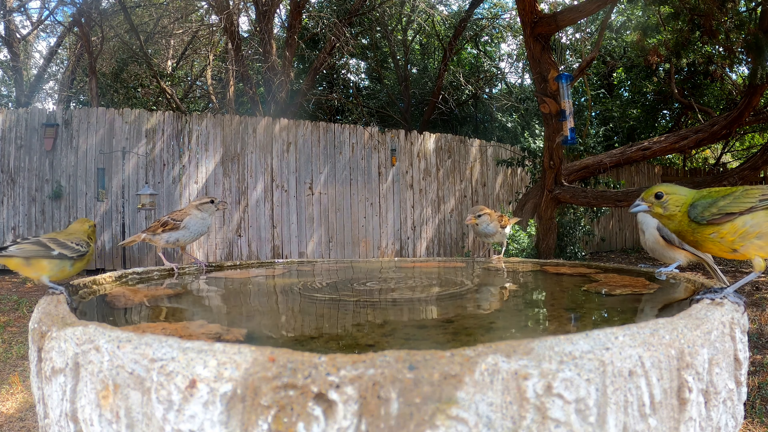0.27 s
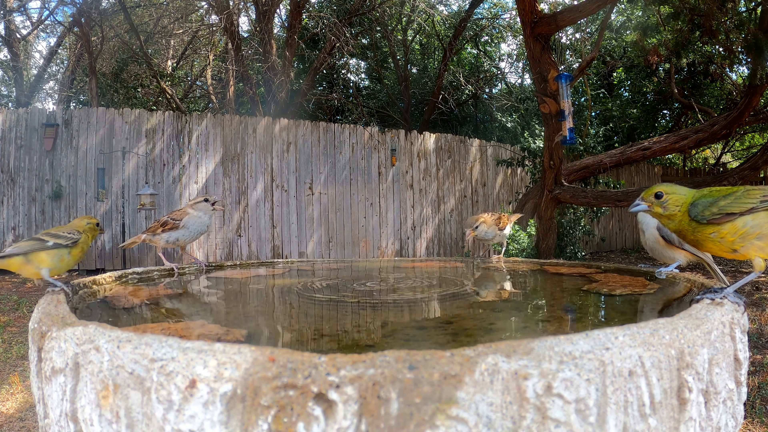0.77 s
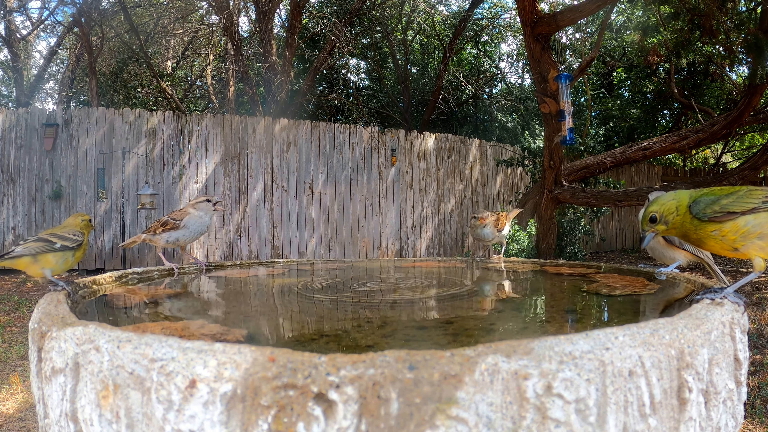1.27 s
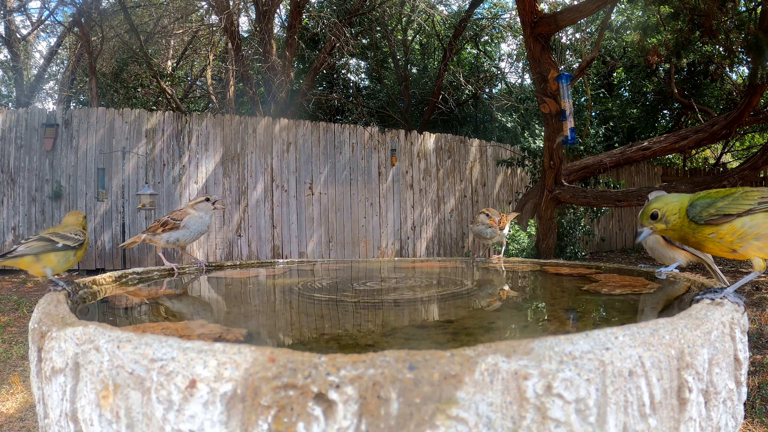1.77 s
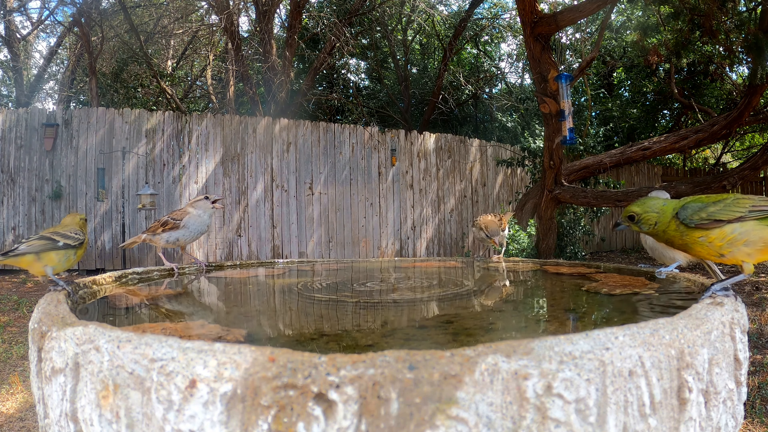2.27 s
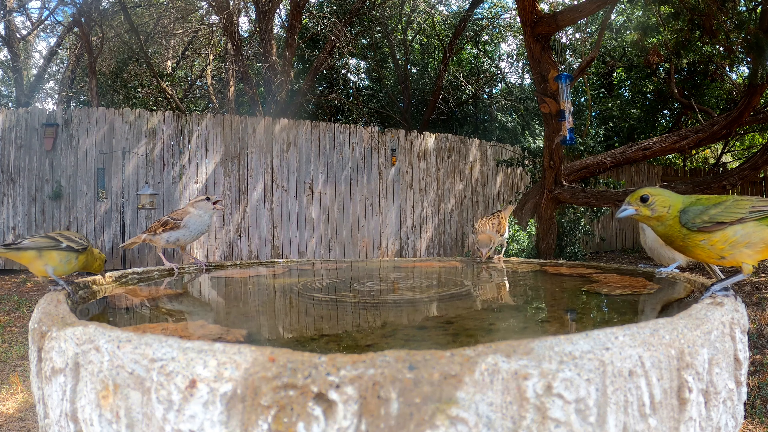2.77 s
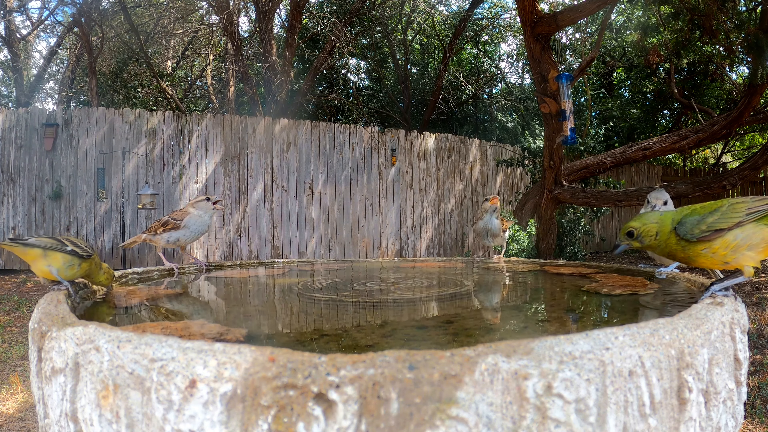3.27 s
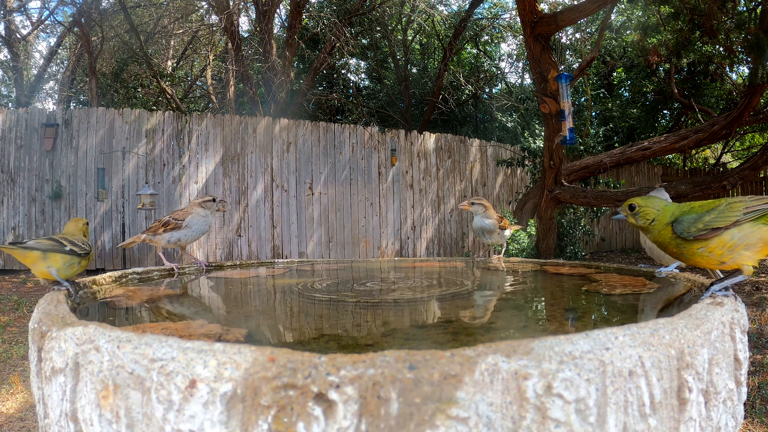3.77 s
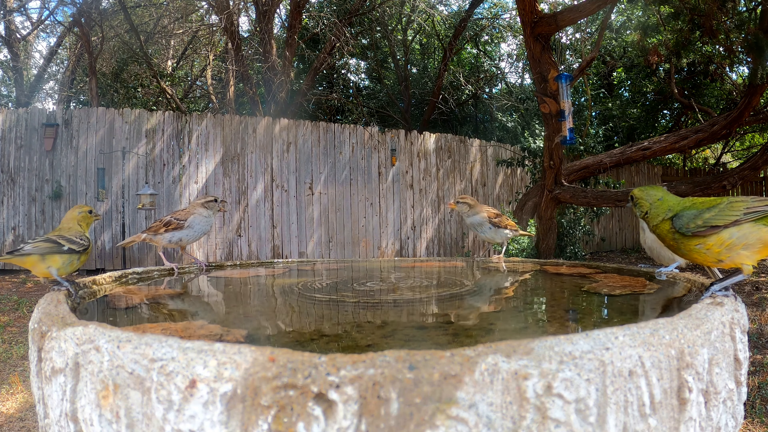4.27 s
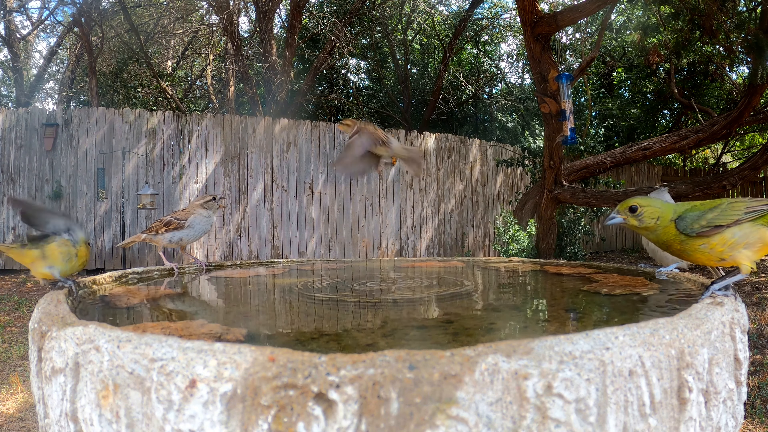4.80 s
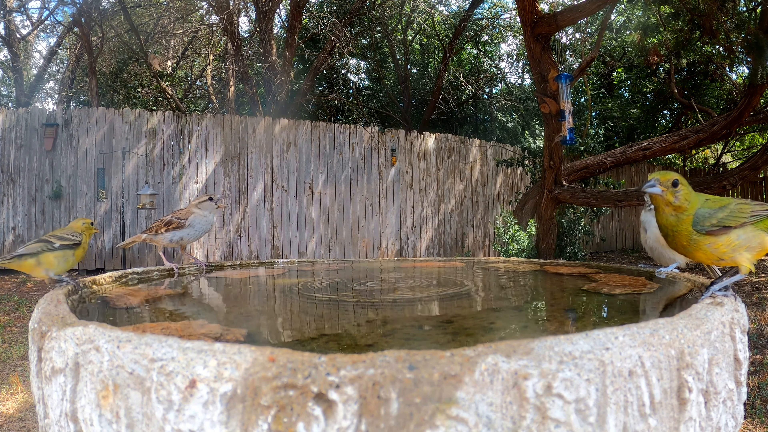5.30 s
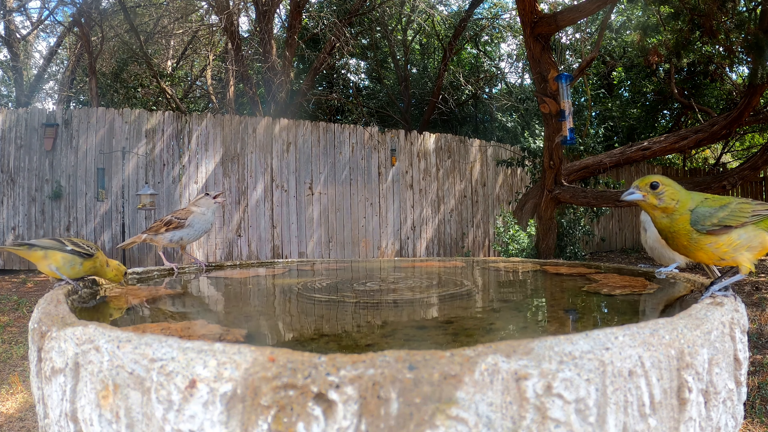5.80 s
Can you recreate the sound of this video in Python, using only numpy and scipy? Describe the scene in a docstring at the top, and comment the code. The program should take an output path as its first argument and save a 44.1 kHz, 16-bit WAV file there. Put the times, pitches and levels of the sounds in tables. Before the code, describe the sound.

Light claw and beak taps ring a stone bird bath over quiet backyard hiss, and a far bird whistles faintly once.

```python
"""Small birds on a stone bird bath

Birds drink and hop on the rim; a microphone pair is fixed to the bath. Claw and beak taps ring
modes of the bowl and the microphone casing; shifts of weight sway the stand at a low note.
One tiny tick sounds, a far bird whistles once, and yard hiss, coloured by the casing's
cavities, comes in with faint steady whines and a faint electrical hum."""
import sys
import numpy as np
from scipy import signal
from scipy.fft import rfft, irfft
from scipy.io import wavfile

SR = 44100
rng = np.random.default_rng(int(sys.argv[2]) if len(sys.argv) > 2 else 0)


def store_pcm(level_fs):
    """Save levels as 16-bit WAV."""
    pcm = np.round(np.clip(level_fs, -1, 1) * 32767).astype(np.int16)
    wavfile.write(sys.argv[1], SR, np.atleast_2d(pcm).T)


N = 266628

# rim taps: t/s, then level/dB into cavity, lid, clip, crack, bowl, deep bowl
TAPS = [(0.3566, -71, -55, -54, -70, -72, -82), (0.7555, -64, -63, -51.5, -80, -81, -69),
        (1.2266, -64, -62, -66, -75, -64, -89), (1.2456, -49, -49.5, -58, -78, -54.5, -65),
        (2.2942, -26, -47, -40.5, -57.5, -51.5, -47.5), (2.3003, -32, -32.5, -45.5, -67.5, -41, -50),
        (2.3243, -27, -54, -52.5, -53.5, -40, -43), (2.329, -36, -32.5, -43, -58.5, -47.5, -45),
        (2.9817, -74, -76, -73, -82, -75, -78.5), (3.283, -60, -60, -73, -74, -74, -79),
        (3.3180, -31, -60, -48, -57, -61, -46), (3.3250, -44, -43.5, -48.5, -52.5, -42.5, -55),
        (4.414, -52, -84, -66, -71, -75.5, -72), (4.749, -59, -69, -61.5, -71, -80, -82),
        (4.8030, -65, -68, -55, -73, -65, -64), (4.8130, -53, -59, -65, -69, -69, -60),
        (4.8205, -52, -52.5, -52.5, -49, -45.5, -48.5), (4.833, -56, -58, -57, -62.5, -58, -55),
        (4.8571, -42, -57, -48, -63, -50, -53.5), (4.8650, -47, -49.5, -46.5, -59.5, -70, -63),
        (4.885, -50, -55, -66, -63, -59, -52), (4.904, -58, -59, -63, -65, -61, -63),
        (4.9248, -51, -60, -60.5, -62, -75, -64.5), (4.9456, -49, -57, -62, -66, -77.5, -65),
        (4.9674, -60, -77, -76, -67, -83, -73), (5.3209, -62, -54, -71, -72, -71.5, -66),
        (5.4342, -61, -62, -69, -72, -69, -76), (5.5780, -73, -63, -70, -85, -63, -73)]
# jolts of the stand: t/s, hold/s, decay/(dB/s), f/Hz, rocking/dB, second note/dB, push/dB
JOLTS = [(0.01, 0.01, 220, 47.5, -44.5, -56.5, -64), (0.178, 0.019, 293, 47.3, -55, -68, -61),
         (0.368, .03, 223, 47.45, -43.5, -60, -69), (0.503, .03, 400, 48.7, -52.5, -67, -61),
         (0.807, 0.067, 456, 47.2, -42, -56, -67), (0.964, 0.049, 295, 47.9, -56.5, -72, -66),
         (1.26, 0.04, 328, 46.6, -48, -63, -66), (1.91, 0.018, 399, 43.05, -61, -66.5, -71),
         (2.055, 0.04, 163, 43.6, -59, -73, -68), (2.302, 0.061, 96.5, 46.9, -35, -49.5, -43),
         (2.46, 0.036, 303, 46.2, -49, -54.5, -64), (2.608, .02, 203, 46.7, -56, -71, -69),
         (2.92, 0.035, 102, 42.74, -61, -72.5, -66), (3.331, 0.061, 140.5, 46.15, -38, -53.5, -56),
         (4.397, 0.039, 261, 41.6, -49, -71, -62), (4.73, 0.021, 149.5, 46.5, -58, -73, -60.5),
         (4.806, .02, 204, 45, -52, -52.5, -46), (4.846, 0.053, 182, 41.48, -36.5, -53.5, -37),
         (4.97, 0.044, 221, 40.8, -43, -56.5, -51), (5.085, 0.025, 149, 41, -53.5, -65, -55),
         (5.331, 0.016, 260, 45.2, -42.5, -56.5, -56), (5.578, 0.034, 198, 44.6, -54.5, -76.5, -57),
         (5.77, 0.023, 186, 44.2, -58.5, -67, -60), (5.908, .02, 400, 48.4, -62, -77.5, -70)]


def taps():
    """Claws and beaks ring the light casing at once, the stone bowl later."""
    # casing and stone modes: f/Hz, level/dB, t60/s, left-right/dB, left lead/rad
    cavity = [(1145, -14.5, 0.021, 4, -.4), (1212, -5.5, 0.051, -1.5, -.2), (1370, -8, 0.018, -0.5, -.3)]
    lid = [(1025, 2.8, 0.1, 6.4, -1.2), (1057, -1.1, 0.047, 18, -1.6)]
    clip = [(1507, 0.82, 0.06, 5, -0.95), (1638, 1.5, 0.042, 9.4, -0.74)]
    crack = [(2065, -1.5, 0.031, 0, -1.1), (2610, -0.5, 0.029, -9.5, -1.6), (2635, 9, 0.031, -1.5, -1.63),
             (2936, -4.5, 0.026, 8, -0.97), (3420, -7.5, 0.017, -0.5, -1.1)]
    bowl = [(396, -15, 0.05, -15, -.3), (480, -3, 0.06, -1.5, -0.072), (548, -10.5, 0.04, -18, -.3),
            (658.8, 5, 0.19, -5.5, -0.92), (700, -15, 0.088, 17, -1.1), (768, -24.5, 0.073, -32, -0.87)]
    deep_bowl = [(78.6, 0.5, 0.2, .4, 0), (162, -26.5, 0.02, .4, 0.099), (220, -5, 0.041, .3, -0.18),
                 (268.4, 2, 0.33, 0.2, -0.49), (329, -3.5, 0.054, 0.1, -.2)]
    _, cavity_db, lid_db, clip_db, crack_db, bowl_db, deep_db = np.transpose(TAPS)
    return (struck(cavity, cavity_db, contact_s=0.0008, spread_db=0.8)
            + struck(lid, lid_db, contact_s=0.003, spread_db=0.8, neighbour_sign=1)
            + struck(clip, clip_db, contact_s=0.0036, spread_db=3)
            + struck(crack, crack_db, contact_s=0.0004, spread_db=1.5)
            + struck(bowl, bowl_db, contact_s=0.01, spread_db=4)
            + struck(deep_bowl, deep_db, contact_s=0.0036, spread_db=3))


def struck(modes, level_db, contact_s, spread_db, neighbour_sign=-1):
    """Damped modes rung by every tap; a longer contact makes the ring swell more slowly."""
    onsets = np.round(np.array(TAPS)[:, 0] * SR).astype(int)
    scatter = rng.normal(0, 1, (len(onsets), len(modes), 2))
    contact_pole = np.exp(-1 / (contact_s * SR))
    out = np.zeros((2, N))
    for k, (hz, mode_db, t60_s, pan_db, lead_rad) in enumerate(modes):
        gain = from_db(level_db + mode_db + spread_db * scatter[:, k, 0])
        clicks = np.full(N, 1e-18, complex)
        clicks[onsets] = gain * np.exp(.25j * scatter[:, k, 1]) * neighbour_sign ** k
        turn = np.exp(2j * np.pi * hz / SR)
        swell = signal.lfilter([1 - contact_pole], [1, -contact_pole * turn], clicks)
        ring = signal.lfilter([1], [1, -from_db(-60 / (t60_s * SR)) * turn], swell)
        tilt = from_db(pan_db / 2) * np.exp(.5j * lead_rad)
        out += [(ring * tilt).imag, (ring / tilt).imag]
    return out


def sway():
    """Birds' jolts rock and push the stand and ring a second note, over a faint electrical hum."""
    # fidgeting between jolts: t/s, rocking/dB, push/dB
    unrest = [(0, -75, -73), (1.4, -66, -70), (2.8, -70, -80), (3.7, -80.5, -82), (4.5, -77.5, -79),
              (5.2, -63, -65), (6.05, -69.5, -70)]
    rest_rock_db, rest_push_db = in_time(unrest)
    _, _, decay_db_per_s, jolt_hz, rock_db, second_db, push_db = np.transpose(JOLTS)
    power = jolt_gains(rock_db, decay_db_per_s) ** 2
    rock_hz = every_sample(jolt_hz @ power / power.sum(0))  # the strongest jolt dominates
    rock_gain = every_sample(np.sqrt(power.sum(0)))
    rocking = rock_gain * (tone(rock_hz) + from_db(-14.5) * band(52, 100))
    second_gain = every_sample(jolt_gains(second_db, decay_db_per_s=148, lag_s=0.019).max(0))
    hum_gain = from_db(-72.5 + 2.2 * drift(5.2))
    note_and_hum = (second_gain + hum_gain) * tone(hz=118.05 + drift(3.1))
    push_gain = every_sample(jolt_gains(push_db, decay_db_per_s=218).max(0))
    pushes = (push_gain + from_db(rest_push_db)) * band(15.5, 33)
    fidgeting = from_db(rest_rock_db) * band(40.3, 47.6)
    return rocking + note_and_hum + pushes + fidgeting


def jolt_gains(level_db, decay_db_per_s, lag_s=0):
    """One envelope per jolt, at every 32nd sample: rise (steeper if hard), hold, decay."""
    hard_db = -42
    start_s, hold_s, _, _, rock_db = np.transpose(JOLTS)[:5, :, None]
    t = np.arange(0, N, 32) / SR - start_s - lag_s
    rise_db_per_s = 332.5 + 115 * np.maximum(rock_db - hard_db, 0)
    before_db = np.maximum(-t, 0) * rise_db_per_s
    after_db = np.maximum(t - hold_s, 0) * np.reshape(decay_db_per_s, (-1, 1))
    return from_db(level_db[:, None] - np.minimum(before_db + after_db, 200))


def wobble():
    """A bird's push-off leaves the stand wobbling slowly."""
    start_s, hz, level_db, t60_s, overtone_db = 4.862, 11.2, -42, 4.5, -12
    t = np.maximum(np.arange(N) / SR - start_s, 0)
    phase = 2 * np.pi * hz * t
    return from_db(level_db - 60 * t / t60_s) * (np.sin(phase) + from_db(overtone_db) * np.sin(2 * phase))


def tick():
    """One tiny tick straight ahead: a band-passed click."""
    start_s, peak_db, centre_hz, width_octaves = 1.393, -51, 3100, 1.15
    edges_hz = [centre_hz / 2 ** (width_octaves / 2), centre_hz * 2 ** (width_octaves / 2)]
    impulse = (np.arange(N) == round(start_s * SR)) + 1e-18
    click = signal.sosfilt(signal.butter(5, edges_hz, "band", fs=SR, output="sos"), impulse)
    return from_db(peak_db) * click / abs(click).max()


def far_bird():
    """A clean rising whistle, its echoes smeared into narrow-band noise."""
    # whistle and echo: t/s, f/Hz, level/dB
    whistle = [(5.175, 3400, -90), (5.2, 3450, -66), (5.23, 3530, -59), (5.285, 3660, -58),
               (5.315, 3740, -66), (5.34, 3810, -69), (5.39, 3740, -85)]
    echo = [(5.21, 3430, -85), (5.25, 3470, -66), (5.32, 3560, -62), (5.45, 3630, -61), (5.55, 3550, -65),
            (5.72, 3490, -68), (5.95, 3350, -90)]
    whistle_hz, whistle_db = in_time(whistle)
    echo_hz, echo_db = in_time(echo)
    direct = from_db(whistle_db) * tone(whistle_hz)
    smear = (drift(45) * tone(echo_hz) + drift(49) * tone(echo_hz + 41)) / 2
    return direct + from_db(echo_db) * smear


def yard():
    """Hiss coloured by the casing cavities, flickering in each octave, with faint whines."""
    # hiss spectrum: f/Hz, relative density/dB
    spectrum = [(15, -26), (30, -7), (90, -12), (170, -12.5), (300, -19.5), (850, -29), (1000, -19),
                (1700, -25), (2050, -27.5), (3500, -23), (3900, -30), (7500, -43.5), (8300, -49.5),
                (10000, -55.5), (12500, -57), (15000, -63)]
    # casing cavities: f/Hz, width/Hz, level/dB
    cavities = [(1229.3, 136, -8), (1607, 240, -21), (2680, 340, -20.5), (2937, 99, -15),
                (3400, 220, -26.5)]
    # leaves swelling in the treble: t/s, gain/dB
    breeze = [(0, -0.5), (1.1, 1.5), (1.9, 4), (2.8, 0), (3.8, 1.5), (4.8, 5.5), (5.4, 3), (6.05, 4)]
    # steady whines: f/Hz, level/dB
    whine_tones = [(2893, -91.5), (3247, -89.5), (3306, -84), (3838, -88.5), (5410, -89.5)]
    hiss_db, flicker_db = -62.5, 1
    hz = np.fft.rfftfreq(N, 1 / SR) + 1
    power = from_db(2 * at_hz(spectrum, hz)[0])
    for peak_hz, width_hz, peak_db in cavities:
        power += from_db(2 * peak_db) / (1 + (2 * (hz - peak_hz) / width_hz) ** 2) ** 2
    noise = rfft(rng.standard_normal((3, N))) * np.sqrt(power / power.mean())  # common, left, right
    octave = np.clip(np.log2(hz / 84), 0, 8)
    leaves_db = in_time(breeze)[0]
    hiss = np.zeros((3, N))
    for k in range(9):
        octave_noise = irfft(noise * np.clip(1 - abs(octave - k), 0, 1), N)
        hiss += from_db(hiss_db + flicker_db * drift(9.6) + leaves_db * (k == 6)) * octave_noise
    whines = sum(from_db(level_db + 2.1 * drift(6.6)) * tone(whine_hz * (1 + 0.0011 * drift(6)))
                 for whine_hz, level_db in whine_tones)
    return through_ports(hiss[0] + whines, hiss[1:])


def through_ports(common, separate=0):
    """Airborne sound enters two microphone ports, each with its own level and phase by frequency."""
    # port pair: f/Hz, coherence, left-right/dB, left lead/rad
    ports = [(28.7, 0.93, -8, 0.5), (122.4, 0.5, 2, 1.2), (169, 0.42, -1.5, -1.05), (500, 0.32, -6.5, -1.5),
             (946, 0.94, -1, -1.8), (1205, 0.96, 3, 0.93), (1690, 0.52, 5, -1.3), (2030, 0.1, -2, -2.0),
             (2310, 0.97, -0.5, -1.65), (3110, 0.91, -0.5, -1.78), (3250, 0.84, 12.5, 0.54),
             (4150, 0.27, -4, -3), (6500, 0.66, -4, 0.5)]
    treble = [(6250, .97, 0, 0), (7400, .92, 1, 0), (8300, .72, 8, 0), (10000, .75, 0, 0)]
    coherence, pan_db, lead_rad = at_hz(ports + treble, np.fft.rfftfreq(N, 1 / SR) + 1)
    coherence = np.clip(coherence, 0, 1)
    mix = np.sqrt(coherence) * rfft(common) + np.sqrt(1 - coherence) * rfft(separate + np.zeros((2, N)))
    tilt = from_db(pan_db / 2) * np.exp(.5j * lead_rad)
    equal_power = np.sqrt(2 / (abs(tilt) ** 2 + abs(tilt) ** -2))
    return irfft(mix * [tilt, 1 / tilt] * equal_power, N)


def from_db(db):
    """dB to gain."""
    return 10 ** (np.asarray(db) / 20)


def rms_one(x):
    """Scale to rms 1."""
    return x / np.sqrt(np.mean(x ** 2) + 1e-20)


def in_time(rows):
    """Columns of a time table at every sample."""
    times_s, *columns = np.transpose(rows)
    return [np.interp(np.arange(N) / SR, times_s, column) for column in columns]


def at_hz(rows, hz):
    """Columns of a spectrum table at the given frequencies."""
    row_hz, *columns = np.transpose(rows)
    return [np.interp(np.log(hz), np.log(row_hz), column) for column in columns]


def every_sample(coarse):
    """Interpolate a curve given at every 32nd sample."""
    return np.interp(np.arange(N) / 32, np.arange(len(coarse)), coarse)


def drift(rate_hz):
    """Slow random curve, rms 1."""
    step, settle = 40, 2000
    pole = np.exp(-2 * np.pi * rate_hz * step / SR)
    noise = rng.standard_normal(N // step + settle + 2)
    slow = signal.lfilter([1], [1, -2 * pole, pole * pole], noise)[settle:]
    return np.interp(np.arange(N) / step, np.arange(len(slow)), rms_one(slow))


def tone(hz):
    """Sine on a pitch curve, rms 1."""
    return np.sqrt(2) * np.sin(2 * np.pi * np.cumsum(hz * np.ones(N)) / SR + rng.uniform(0, 2 * np.pi))


def band(low_hz, high_hz):
    """Band noise, rms 1."""
    bandpass = signal.butter(2, [low_hz, high_hz], "band", fs=SR, output="sos")
    return rms_one(signal.sosfilt(bandpass, rng.standard_normal(N)))


def scene():
    """Structure-borne taps and sway, a tick, airborne bird and yard."""
    stand_pan = from_db([[.2], [-.2]])
    return taps() + (sway() + wobble()) * stand_pan + tick() + through_ports(far_bird()) + yard()


def record(dry):
    """Steep low-pass."""
    stop_hz = 15600
    return signal.sosfilt(signal.cheby2(12, 40, stop_hz, fs=SR, output="sos"), dry)


dry = scene()
out = record(dry)
store_pcm(out)
```